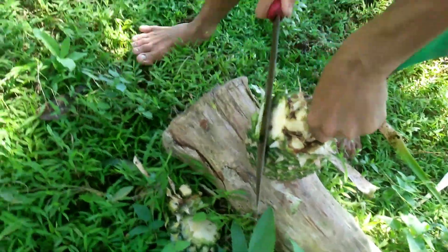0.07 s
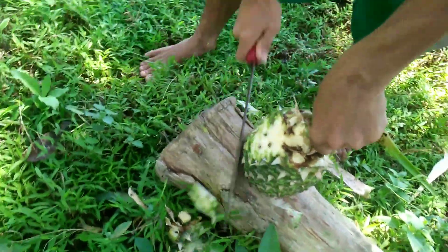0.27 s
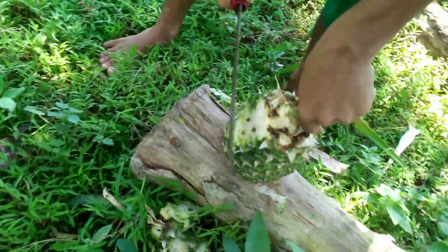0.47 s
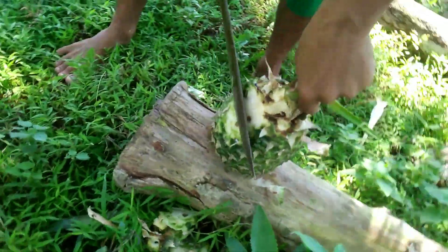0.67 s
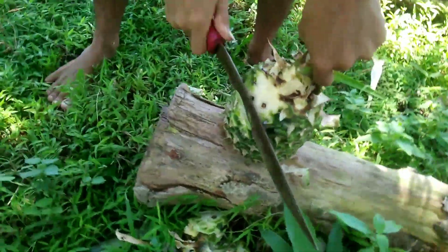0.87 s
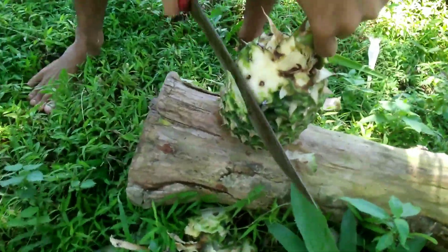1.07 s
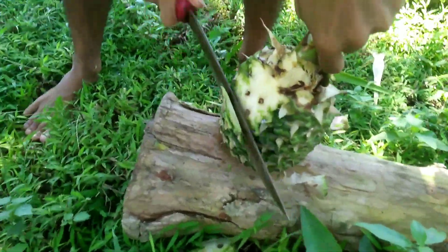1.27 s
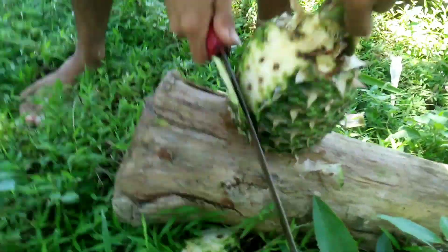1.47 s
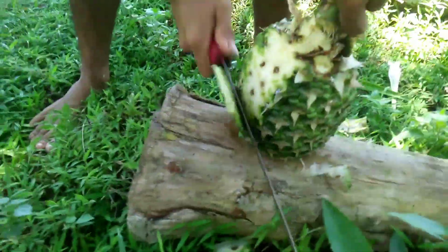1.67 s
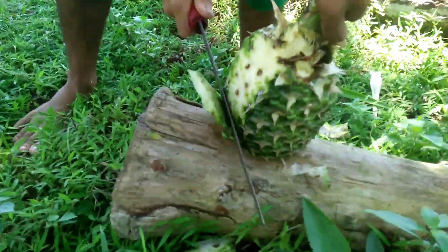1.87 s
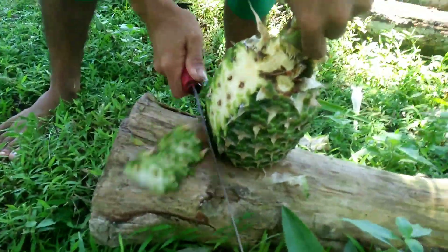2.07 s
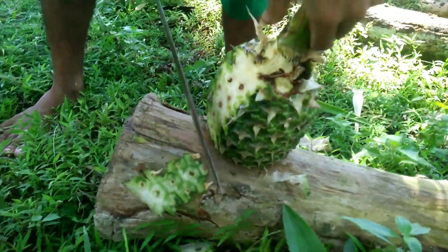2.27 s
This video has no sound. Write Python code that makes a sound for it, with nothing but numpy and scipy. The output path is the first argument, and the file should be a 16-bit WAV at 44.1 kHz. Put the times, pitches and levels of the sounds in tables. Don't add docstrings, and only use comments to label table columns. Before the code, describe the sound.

A long blade hacks and slices wet, tough fruit rind on a log outdoors, with short rasps

```python
import sys
import numpy as np
from scipy import signal
from scipy.fft import rfft, irfft
from scipy.io import wavfile
from scipy.ndimage import uniform_filter1d

SR = 44100
rng = np.random.default_rng(int(sys.argv[2]) if len(sys.argv) > 2 else 0)


def wav_record(signal):
    frames = np.transpose(np.atleast_2d(signal))
    bounded = np.clip(frames, -1, 1)
    quanta = np.round(bounded * 32767).astype(np.int16)
    wavfile.write(sys.argv[1], SR, quanta)


def nominal_scale(level):
    x = np.asarray(level, float) / 20
    return 10 ** x


N = 101429


def evened(x):
    return x / np.sqrt(np.mean(x ** 2) + 1e-20)


def colour(x, points):
    f, db = np.transpose(points)
    hz = np.fft.rfftfreq(len(x), 1 / SR)
    gain = nominal_scale(np.interp(np.log(hz + 1), np.log(f), db))
    return irfft(rfft(x) * gain, len(x))


def add(mix, s, sound):
    part = mix[max(round(s * SR), 0):][:len(sound)]
    part += sound[:len(part)]


def resonate(x, hz, width):
    turn = np.exp(2j * np.pi * hz * np.arange(len(x)) / SR)
    r = np.exp(-np.pi * width / SR)
    return 2 * (turn * signal.lfilter([1 - r], [1, -r], x / turn)).real


def band(x, hz, width):
    return resonate(resonate(x, hz, width), hz, width)


def slow(span_s):
    size = max(int(span_s * SR), 2)
    return evened(uniform_filter1d(uniform_filter1d(rng.standard_normal(N), size), size))


def patchy(x):
    z = signal.stft(x, nperseg=256)[2]
    patch = uniform_filter1d(rng.standard_normal(z.shape), size=7, axis=0)
    patch = uniform_filter1d(patch, size=5, axis=1)
    patch_db = 2 * evened(patch)
    return signal.istft(z * nominal_scale(patch_db), nperseg=256)[1][:N]


def stroke(start, length, db, swell_db):
    edge_s, edge_share, lift_t60 = 0.0027, 0.1, 0.04
    t = np.arange(N) / SR - start
    edge = edge_s + edge_share * length
    gate = np.clip(t / edge + 0.5, 0, 1) ** 2
    fade_s = lift_t60 * edge / edge_s / 2
    drift_db = swell_db * np.clip(t / length, 0, 1)
    return gate * nominal_scale(db + drift_db - 60 * np.maximum(t - length, 0) / fade_s)


def without_deep_bass(x):
    return signal.sosfilt(signal.butter(4, 61, 'high', fs=SR, output='sos'), x)


# (f/Hz, level/dB per Hz)
HISS_COLOUR = [(18, -32), (30, -10.5), (134, -2), (367, -17), (2010, -18), (5230, -7.5), (6940, -18),
               (11600, -25), (14300, -34.5)]
# (t/s, level/dB)
GUSTS = [
    (0.0, -76.5),
    (0.34, -73),
    (2.3, -75.5),
]


def outdoors(work):
    low_hz, high_hz, breeze_db, activity_power = 53.7, 143, 19, 0.25
    hiss_db, microphone_db = -64.5 - 11, -82.5
    shape = [(low_hz / 2, -30), (low_hz, 0), (high_hz, -2), (high_hz * 1.7, -30), (high_hz * 4, -70)]
    breeze = colour(rng.standard_normal(N), shape)
    breeze = breeze / np.sqrt(uniform_filter1d(breeze ** 2, size=6000))
    gusts = nominal_scale(breeze_db + np.interp(np.arange(N) / SR, *np.transpose(GUSTS)))
    activity = abs(uniform_filter1d(work ** 2, size=1500)) ** (activity_power / 2)
    hiss = evened(colour(rng.standard_normal(N), [(150, -39.5)] + HISS_COLOUR[3:])) * nominal_scale(hiss_db)
    return hiss + breeze * gusts * activity + nominal_scale(microphone_db) * rng.standard_normal(N)


# (t/s, peak level/dB, f/Hz, t60/s)
KNOCKS = [(0.595, -54, 294, 0.031), (.837, -36.5, 2050, 0.016), (.858, -42.5, 675, 0.029),
          (.859, -47, 1400, .016), (1.1, -50.5, 1320, 0.023), (1.12, -45.5, 1490, .015),
          (.859, -44, 340, 0.022), (.986, -47, 914, 0.025), (.965, -45.5, 2260, 0.023),
          (1.2, -36, 1480, 0.0095), (1.298, -42, 1090, 0.018), (1.297, -47, 546, 0.021)]


def knocks():
    rise_s, roughness = 0.0017, 0.2
    out, t = np.zeros(N), np.arange(8000) / SR
    noise = rng.standard_normal((len(KNOCKS), len(t)))
    for (s, db, hz, t60), x in zip(KNOCKS, noise):
        note = np.sin(2 * np.pi * hz * t) + roughness * evened(resonate(x, hz, 0.6 * hz))
        add(out, s, np.minimum(t / rise_s, 1) * nominal_scale(db - 60 * t / t60) * note)
    return without_deep_bass(out)


# (t/s, peak level/dB, contact/s, crack level/dB, first dent level/dB, crack f/Hz)
CHOPS = [
    (0.2404, -16, .0011, 3, 9, 3200),
    (2.0353, -28.5, 0.0012, -8, 10.5, 4600),
]
# (f/Hz, level/dB, t60/s)
LOG_NOTES = [
    [(74, -19, .11), (149.8, -27, .07), (320, -10, .08), (423, -10, 0.042), (519.7, 1, .047),
     (640.3, 4.5, .042), (790, -5, 0.021), (900, -9, .025), (1075.4, -8, 0.027), (1535, -11.5, .03),
     (1932, -10, 0.021), (2213, 4.5, .028), (2929, -0.5, .02), (4100, -3, .04)],
    [(75.3, -21.5, .11), (335, -8, .08), (470, 2, .04), (530, 0, 0.046), (613.5, 8, .04), (798, -9, .025),
     (710, -5, 0.027), (1034, 0, 0.031), (1498, -3, 0.031), (1850, -0.5, 0.025), (4053, 1, 0.047),
     (5010, -1, .025), (5840, 0, 0.045), (6700, 3, 0.026)],
]


def chops():
    ring_rise = 0.0001 * SR
    crack_width, crack_rise_s, crack_t60 = 3000, 0.00049, 0.022
    thud_hz, thud_width, thud_db, thud_rise_s, thud_t60 = 473, 570, -5, 0.004, 0.063
    out, t = np.zeros(N), np.arange(8000) / SR
    noise = rng.standard_normal((len(CHOPS), len(t)))
    for (s, db, contact, crack_db, dent_db, crack_hz), wood, x in zip(CHOPS, LOG_NOTES, noise):
        push = np.hanning(max(int(contact * SR), 4))
        add(out, s - 0.65 * contact, -nominal_scale(db + dent_db) * push)

        ring = sum(nominal_scale(note_db - 60 * t / t60) * np.sin(2 * np.pi * hz * t) for hz, note_db, t60 in wood)
        ring = signal.lfilter([1], [1, -np.exp(-1 / ring_rise)], ring) / (ring_rise + 0.5)
        crack = evened(band(x, crack_hz, crack_width)) * np.minimum(t / crack_rise_s, 1)
        crack = crack * nominal_scale(crack_db - 60 * t / crack_t60)
        thud = evened(band(x[::-1], thud_hz, thud_width)) * np.minimum(t / thud_rise_s, 1)
        thud = thud * nominal_scale(thud_db - 60 * t / thud_t60)
        add(out, s, nominal_scale(db) * (ring + crack + thud))
    return without_deep_bass(out)


# (start t/s, length/s, level/dB, extra level of the notes other than 9750 Hz/dB)
SINGS = [
    (.826, .012, -70, -10),
    (.873, .019, -61, -20),
    (.903, .004, -66, -10),
    (.930, .011, -48, -11),
    (.966, .008, -66, 9),
    (.982, .008, -62, 11),
    (.9955, .003, -45, -9),
]
# (f/Hz, width/Hz, level/dB, 1 if it takes the extra level)
BLADE_NOTES = [(9750, 90, 0, 0), (7910, 90, -1, 1), (13150, 400, -4, 1), (11400, 200, -8, 1)]


def blade():
    out, t = np.zeros(N), np.arange(N) / SR
    drag = rng.standard_normal((len(BLADE_NOTES), N))
    for (hz, width, db, follows), x in zip(BLADE_NOTES, drag):
        level = np.zeros(N)
        for start, length, sing_db, extra_db in SINGS:
            level += stroke(start, length, sing_db + extra_db * (follows > 0.5), -2)
        tone = evened(band(x, hz, width)) / 3 + np.sin(2 * np.pi * hz * t)
        out += nominal_scale(db) * level * tone
    return out


# (start t/s, length/s, level/dB, centre f/Hz, width/Hz)
HISSES = [(.2, .008, -52, 4560, 700), (.2105, 0.0044, -27.5, 3260, 1000), (0.2194, .006, -28, 3560, 1500),
          (0.223, 0.0044, -36, 5230, 600), (0.216, 0.0067, -40, 1100, 500), (.249, .008, -41, 4800, 2500),
          (.979, .011, -41, 5300, 2000), (1.282, .018, -46.5, 4500, 1300), (1.45, .012, -60, 4700, 2500),
          (1.44, .05, -70.5, 11200, 1800), (1.555, 0.038, -66.5, 6300, 2203),
          (1.73, .012, -61.5, 5690, 1200), (1.742, .02, -67, 11800, 1500), (1.78, .028, -69, 11980, 1800),
          (2.028, .005, -52, 3010, 1200), (2.044, 0.013, -55, 5600, 1200), (2.06, .025, -66.5, 5160, 1500),
          (2.092, 0.019, -66.5, 5900, 700), (2.162, 0.047, -71, 5900, 900)]


def hisses():
    out = np.zeros(N)
    flicker = rng.standard_normal(N) * nominal_scale(2.8 * slow(0.002))
    for start, length, db, hz, width in HISSES:
        out += stroke(start, length, db, -2) * evened(band(flicker, hz, width))
    return out


# (f/Hz, level/dB per Hz)
RIND_COLOUR = [(88, -33.5), (150, -10.5), (770, -8), (1200, -8.5), (4890, 0), (6400, -8), (11200, -13),
               (14100, -24), (14900, -45)]
# (t/s, peak level/dB, f/Hz, t60/s)
SNAPS = [(0.218, -11.5, 4800, 0.025), (.313, -50, 3310, 0.015), (.330, -44.5, 2670, 0.045),
         (.343, -32.5, 3480, 0.02), (0.408, -38, 4970, 0.024), (0.467, -33.5, 4550, 0.026),
         (0.485, -30.5, 4990, 0.016), (.502, -47.5, 6490, 0.015), (0.596, -65, 4510, 0.032),
         (0.771, -42, 4160, 0.016), (0.835, -37.5, 4485, 0.025), (.860, -41, 3015, 0.032),
         (0.9298, -36, 5540, 0.016), (0.965, -38.5, 5370, 0.045), (0.9872, -19.5, 5400, 0.015),
         (0.9946, -13.5, 5600, 0.012), (1.001, -26.5, 5650, 0.023), (1.019, -41, 3400, 0.017),
         (1.089, -55, 4800, 0.026), (1.1202, -21, 5720, 0.011), (1.145, -24.5, 5600, 0.013),
         (1.181, -42, 4600, 0.037), (1.201, -39, 3910, .03), (1.240, -40.5, 4900, 0.026),
         (1.297, -35.5, 5960, 0.036), (1.391, -46, 4914, 0.039), (1.83, -40.5, 4600, 0.028),
         (2.014, -42, 4890, 0.039), (2.191, -55.5, 5500, 0.047), (0.2186, -20, 7300, .02),
         (.2245, -24, 3700, .018), (.2125, -25, 3100, .014), (.2435, -24, 5800, .02),
         (0.985, -34, 6000, .012), (.989, -27.5, 3200, .015), (.9965, -28, 3500, .015),
         (1.1223, -37, 3700, 0.029), (1.147, -37, 3400, .015), (1.151, -47, 13500, 0.021),
         (1.2835, -40, 4900, .015), (1.7445, -39.5, 4548, 0.018), (1.674, -60.5, 5200, .02),
         (1.863, -55, 5400, 0.031), (2.007, -51.5, 5400, .03), (.865, -44, 4630, .02)]


def snaps():
    rise_s, tick_width, puff_db, puff_low_db = 0.0005, 0.25, -5.5, -11
    tail_db, tail_stretch = -13, 3
    out, t = np.zeros(N), np.arange(3000) / SR
    noise = rng.standard_normal((len(SNAPS), 2, len(t)))
    for (s, db, hz, t60), (a, b) in zip(SNAPS, noise):
        tick = evened(band(a, hz, tick_width * hz))
        tick = tick + 2 * np.sin(2 * np.pi * hz * t) * nominal_scale(-120 * t / t60)
        puff = colour(colour(b, RIND_COLOUR), [(1500, puff_low_db), (2500, 0)])
        puff = nominal_scale(puff_db) * evened(puff)
        tail = nominal_scale(tail_db - 60 * t / t60 / tail_stretch) * puff
        snap = nominal_scale(-60 * t / t60) * (tick + puff) + tail
        add(out, s, np.minimum(t / rise_s, 1) * nominal_scale(db - 9.5) * snap)
    return out


# (start t/s,
# length/s, level/dB, swell over the stroke/dB, brightness/dB)
STROKES = [(0, 0.11, -53, -11, -1), (0.116, 0.063, -67.5, 7.5, -8.5), (0.196, 0.017, -60, 12, 0),
           (0.21, 0.0045, -36.5, 1, 1.5), (0.2177, 0.0063, -32, -3, 8.5), (0.234, 0.0047, -55.5, 9, 9),
           (0.246, 0.065, -44.5, -16.5, 0.5), (0.312, 0.08, -54, 4, 2), (0.4, 0.097, -52, 4.5, 6.5),
           (0.533, 0.094, -63.5, -6, 0.5), (0.591, 0.15, -56.5, -3, -0.5), (0.766, 0.059, -53, -11, -14),
           (.83, 0.011, -51.5, 8, -1), (0.959, 0.015, -56, 6.5, 4.5), (.979, 0.0087, -46, 3.5, 3),
           (1.002, 0.182, -56, -5.5, 0), (1.12, 0.035, -52, -3, 1), (1.166, 0.086, -47.5, -6, 1.5),
           (1.277, 0.027, -55.5, -3, -2), (1.309, 0.061, -55, -12, -2.5), (1.386, 0.11, -58.5, -4.5, -3),
           (1.501, .1, -67, 1, -8), (1.686, .15, -66, 1, -4), (1.858, 0.06, -67, -7.5, -5),
           (2.007, 0.043, -57, 3, 1),
           (.85, 0.099, -55.5, -7.5, -1),
    (0.924, 0.023, -54, -5.5, 6),
    (.998, 0.0057, -42, -4.5, 4),
    (1.738, 0.03, -62, -2.5, 5.5),
    (1.78, 0.026, -58.5, -5, 2.5),
    (2.028, 0.012, -48.5, 11, 1.5),
    (2.066, 0.062, -66.5, -15, 1),
    (2.157, 0.13, -72, 4.5, -15.5),
]


def rasp():
    grains_per_s, spread_db, grain_fade_s = 810, 3, 0.00055
    smooth_db, flicker_db = 4, -1
    presence_hz, presence_width, presence_db = 5330, 1500, -3.5
    size = nominal_scale(spread_db * np.minimum(rng.exponential(1, N), 4))
    grains = size * (rng.random(N) < grains_per_s / SR)
    puff = signal.lfilter([1], [1, -np.exp(-1 / (grain_fade_s * SR))], grains)
    grit = evened(puff * rng.standard_normal(N)) + nominal_scale(smooth_db) * rng.standard_normal(N)
    body = evened(colour(patchy(grit) * nominal_scale(flicker_db * slow(0.018)), RIND_COLOUR))
    body = evened(body + nominal_scale(presence_db) * band(body, presence_hz, presence_width))
    treble = colour(body, [(5800, -40), (7000, 0)])
    out = np.zeros(N)
    for start, length, db, swell_db, bright_db in STROKES:
        out += stroke(start, length, db, swell_db) * (body + (nominal_scale(bright_db) - 1) * treble)
    return out


def scene():
    work = hisses() + snaps() + rasp()
    return (outdoors(work) + knocks() + chops() + blade() + work)[None]


def band_limit(x):
    return signal.sosfilt(signal.butter(12, 15080, fs=SR, output="sos"), x)


def record(dry):
    mix = signal.oaconvolve(dry, signal.firwin(201, 14400, fs=SR)[None], "same")
    return band_limit(mix)


dry = scene()
out = record(dry)
wav_record(out)
```